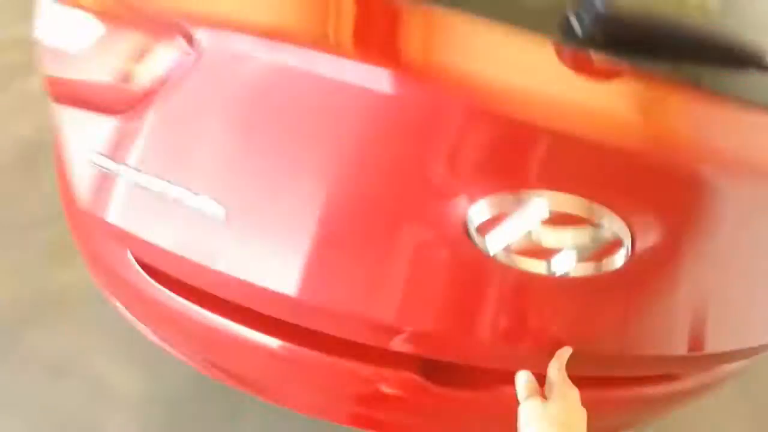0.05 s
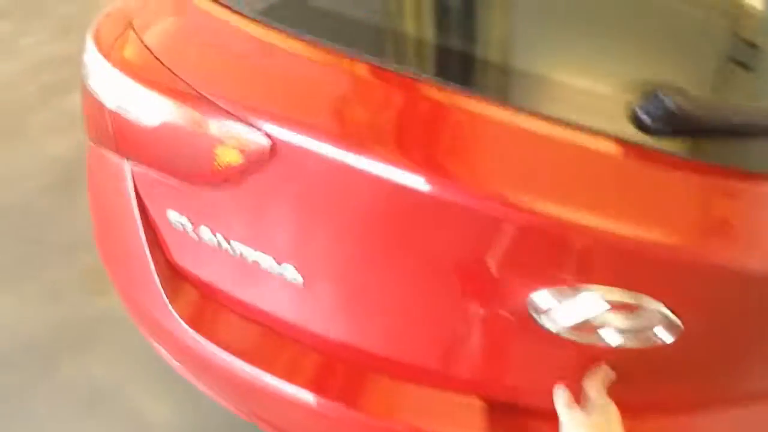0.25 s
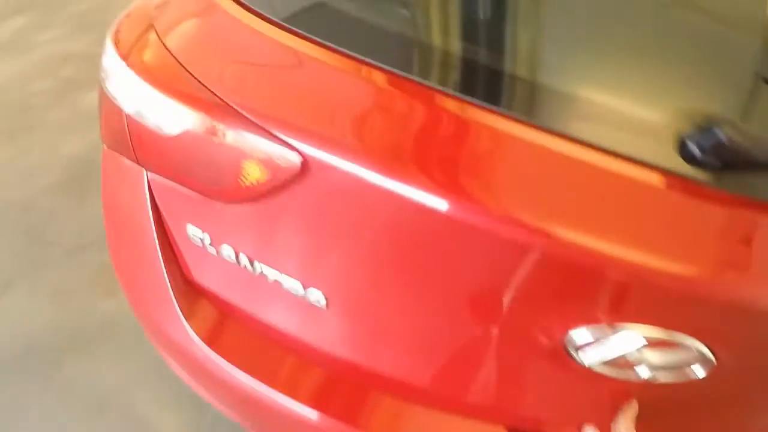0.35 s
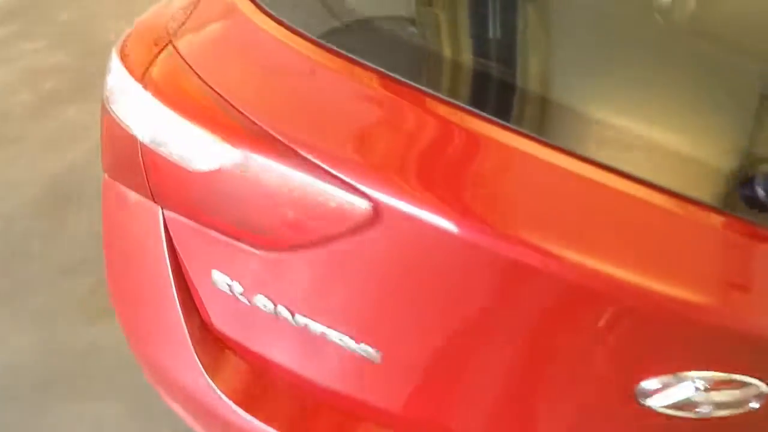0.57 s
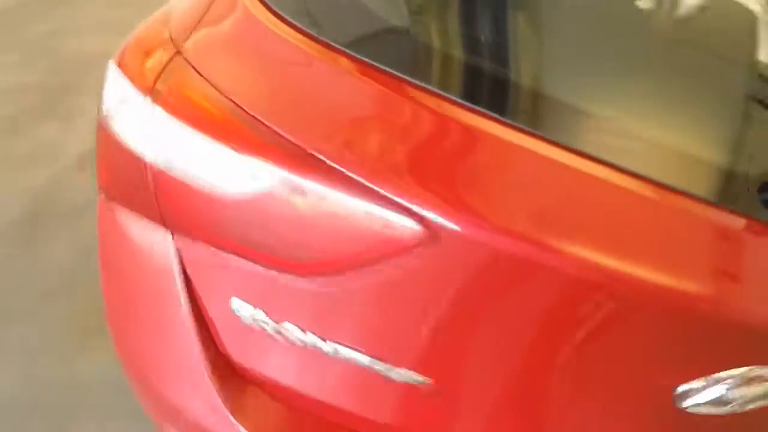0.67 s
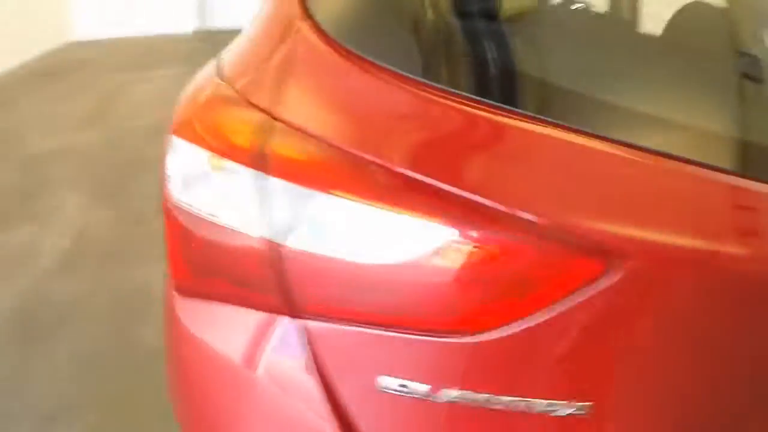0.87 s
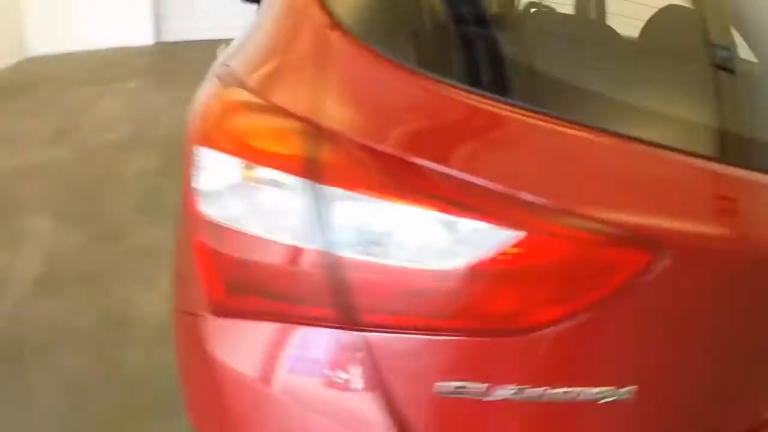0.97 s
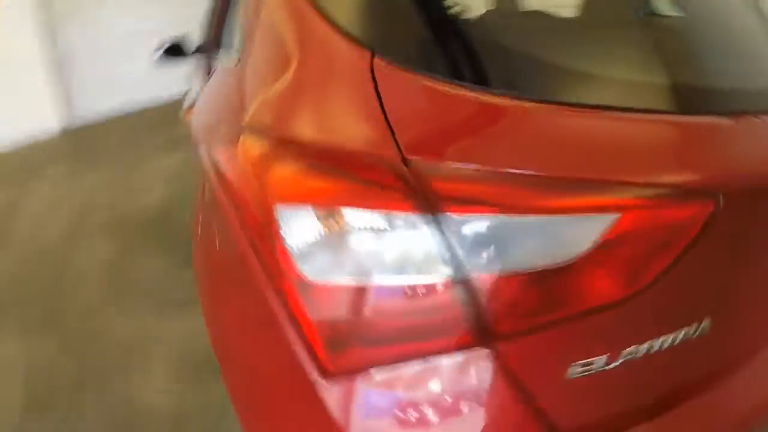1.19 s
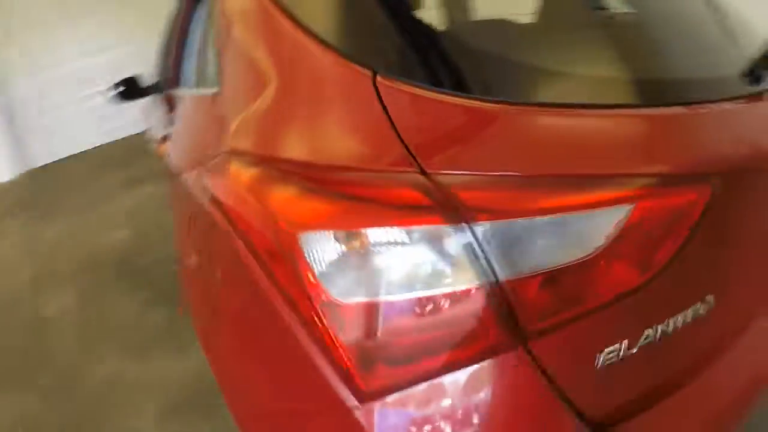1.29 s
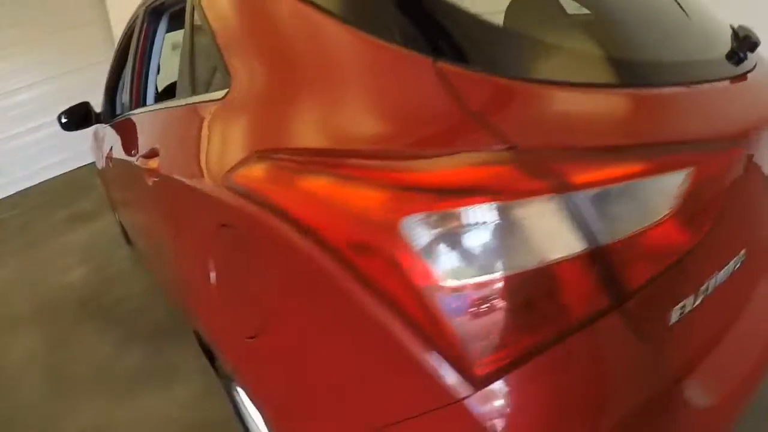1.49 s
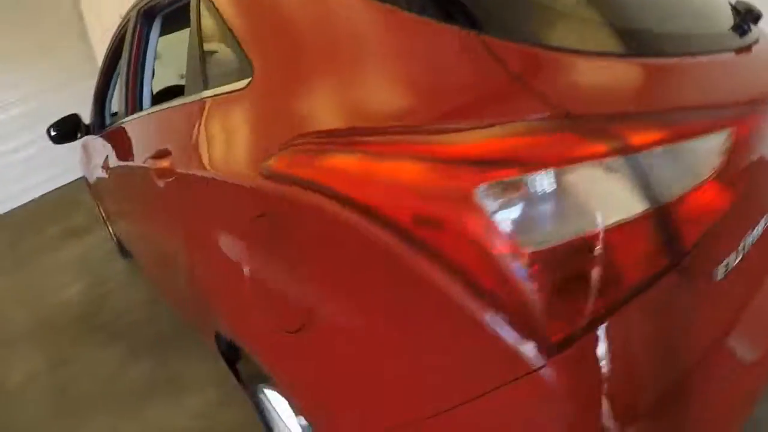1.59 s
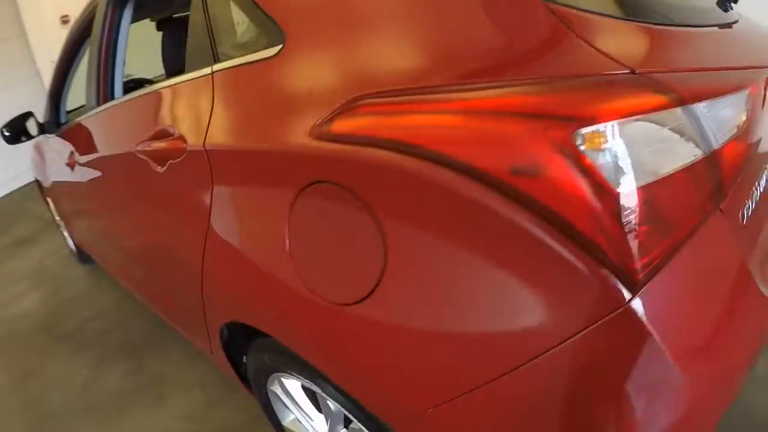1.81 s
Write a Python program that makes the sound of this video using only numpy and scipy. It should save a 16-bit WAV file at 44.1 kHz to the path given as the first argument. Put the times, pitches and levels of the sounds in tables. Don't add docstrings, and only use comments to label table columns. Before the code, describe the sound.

A car's rear hatch slams in a hard-walled garage, heard close on a handheld microphone. Low air rumble and swish come first; at about 0.25 s the seal, latch and bumpers hit almost together, a loud boomy thud with metallic clack, then a small rattle to 0.37 s. The dull echo decays while handling ticks and rustles appear from 0.7 to 1.15 s, with a low bump near 1.1-1.2 s.

```python
import sys
import numpy as np
from scipy import signal
from scipy.fft import rfft, irfft
from scipy.io import wavfile
from scipy.ndimage import uniform_filter1d

SR = 44100
rng = np.random.default_rng(int(sys.argv[2]) if len(sys.argv) > 2 else 0)


def magnitude_from_level(level_db):
    exponent = np.asarray(level_db, float) / 20
    return 10 ** exponent


def store_wav(level_fs):
    pcm = np.round(np.clip(np.atleast_2d(level_fs), -1, 1) * 32767)
    wavfile.write(sys.argv[1], SR, pcm.T.astype(np.int16))


N = 81585

# t/s, level/dB, burst length/s, upper limit f/Hz
CONTACTS = [
    (0.2404, -24, 0.0059, 1500),
    (0.25, -11, 0.0023, 1500),
    (0.248, -9.5, 0.0056, 4500),
    (.2500, -33, 0.011, 12350),
    (0.26, -20.5, 0.0043, 13000),
    (.2560, -15.5, 0.015, 4960),
    (0.27, -15.5, 0.0073, 5300),
    (0.277, -23.5, 0.013, 3000),
    (.3213, -28.5, .004, 3200),
    (0.3, -29.5, 0.043, 3600),
]


def clock():
    return np.arange(N) / SR


def unit(x):
    return x / np.sqrt(np.mean(x ** 2))


def white():
    return rng.standard_normal(N)


def bins():
    return np.arange(N // 2 + 1) * SR / N + 1


def colour(x, points):
    f, db = np.array(points).T
    gain = magnitude_from_level(np.interp(np.log(bins()), np.log(f), db))
    return irfft(rfft(x) * gain, N)


def band_noise(x, order, low, high):
    return signal.sosfilt(signal.butter(order, [low, high], "band", fs=SR, output="sos"), x)


def ring(x, modes):
    out = 0
    for hz, db, t60 in modes:
        radius = np.exp(-np.log(1000) / (t60 * SR))
        pole = radius * np.exp(2j * np.pi * hz / SR)
        out = out + magnitude_from_level(db) * np.sqrt(1 - radius) * signal.lfilter([1], [1, -pole], x).imag
    return out


def swing(modes):
    out = 0
    for at, hz, db, t60 in modes:
        u = np.maximum(clock() - at, 0)
        rise = 1 - np.exp(-4 * u * hz)
        out = out + rise * magnitude_from_level(db - 60 * u / t60) * np.sin(2 * np.pi * hz * u)
    return out


def burst(at, length):
    u = np.maximum(clock() - at, 0) / length
    return 2 * np.e * u * np.exp(-2 * u)


def walk(rate):
    k = int(SR / rate)
    return unit(uniform_filter1d(uniform_filter1d(white(), k), k))


def floor():
    # f/Hz, level/dB per Hz
    spectrum = [(12, -27), (20, -4), (123, -6), (222, -16.5), (270, -14), (367, -19.5), (1220, -24.5),
                (14700, -47), (16000, -57.5)]
    floor_db, swish_db, hum_hz, hum_db = -50.5, 2, 121, -55
    full = rfft(unit(colour(white(), spectrum)))
    noise = 0
    for octave in range(4, 15):
        share = np.clip(1 - np.abs(np.log2(bins()) - octave), 0, 1)
        noise = noise + irfft(full * share, N) * magnitude_from_level(walk(5))
    t = clock()
    hum = magnitude_from_level(hum_db + 1.5 * walk(4.2)) * np.sin(2 * np.pi * hum_hz * t)
    falling = t < CONTACTS[0][0]
    return noise * magnitude_from_level(floor_db + swish_db * falling) + hum


def air():
    # t/s, level/dB
    gusts = [(0, -29), (0.068, -24), (0.098, -39.5), (.14, -44), (.2, -39.5), (.3, -54), (.9, -45),
             (1.081, -51), (1.116, -38.5), (1.205, -39.5), (1.24, -55.5), (1.85, -57.5)]
    # f/Hz, level/dB
    gust_tone = [(15, -6), (30, -4), (52, 0), (100, -14), (200, -21.5), (350, -28.5), (600, -66.5)]
    sway_hz, sway_db, rumble_db = 51, -2.5, -1.5
    t = clock()
    phase = 2 * np.pi * sway_hz * t + .25 * walk(12)
    sway = magnitude_from_level(sway_db) * np.sqrt(2) * np.sin(phase)
    rumble = magnitude_from_level(rumble_db) * unit(colour(white(), gust_tone))
    gust_t, gust_db = np.array(gusts).T
    return magnitude_from_level(np.interp(t, gust_t, gust_db)) * (sway + rumble)


def ticks():
    # t/s, middle level/dB, treble level/dB
    tick_times = [(0.702, -58, -65), (.722, -58, -58), (.740, -48, -60), (0.757, -63, -60),
                  (.774, -47, -64), (.781, -60, -64), (0.787, -62, -69), (0.7994, -40, -45),
                  (0.803, -55, -61), (0.931, -50, -72), (.973, -66, -55), (0.992, -56, -64),
                  (1.002, -63, -58), (1.017, -47, -73), (1.026, -52.5, -68), (1.04, -54, -65),
                  (1.063, -54, -44), (1.068, -41, -35), (1.124, -47, -52), (1.132, -69, -54.5),
                  (1.138, -46, -48), (1.369, -78, -54)]
    # f/Hz, level/dB, t60/s
    mid_modes = [(3200, 0, .003), (4600, 0, .003), (1900, -5, .003)]
    # f/Hz, level/dB, t60/s
    top_modes = [(7500, -5, .002), (10500, 1, .003), (12500, -4, .002), (14500, -5, .002)]
    length_s, gain_db = .0008, 3
    mid, top = 0, 0
    for at, mid_db, top_db in tick_times:
        envelope = burst(at, length_s)
        mid = mid + magnitude_from_level(mid_db) * envelope
        top = top + magnitude_from_level(top_db) * envelope
    return magnitude_from_level(gain_db) * (ring(mid * white(), mid_modes) + ring(top * white(), top_modes))


def button():
    return swing([
        (1.0255, 3340, -44, 0.011),
        (1.0635, 3180, -44, 0.019),
        (1.0640, 4670, -41.5, 0.013),
        (1.0683, 3230, -37, 0.011),
        (1.0684, 4750, -35, 0.0074),
    ])


def rustle():
    # start t/s, length/s, level/dB, lowest f/Hz
    strokes = [
        (.70, 0.093, -64, 2700),
        (0.874, 0.23, -55.5, 930),
        (1.098, 0.063, -53, 1100),
        (0.8, 0.073, -44, 380),
        (1.4, .07, -64, 1900),
    ]
    span, grain_db = 5, 2.5
    grain = magnitude_from_level(grain_db * walk(600)) * white()
    rub = 0
    for at, length, db, hz in strokes:
        stroke = np.sin(np.pi * np.clip((clock() - at) / length, 0, 1))
        rub = rub + magnitude_from_level(db) * stroke * band_noise(grain, 1, hz, span * hz)
    return rub


def trim():
    # f/Hz, level/dB, t60/s
    trim_modes = [(8900, -12, .007), (10200, -12, .007), (14300, -28, .005), (500, 2, .012),
                  (2500, -6, .003)]
    at_s, level_db, length_s = .3640, -19, .002
    return magnitude_from_level(level_db) * ring(burst(at_s, length_s) * white(), trim_modes)


def garage():
    # f/Hz, level/dB, t60/s
    walls = [(44, -3, 3.2), (99, 0, 1.34), (253, 3.5, 1.107), (497, -6, 1.036), (1000, -8, 1.06),
             (1950, -17, 1.046), (4000, -20, 0.99), (6500, -25.5, 0.5), (10000, -34, 0.47),
             (14000, -40.5, 0.34)]
    wet_db, onset_s = -2.5, 0.013
    wall_hz, wall_db, wall_t60 = np.array(walls).T
    t = np.maximum(clock() - CONTACTS[2][0], 0)
    tail = 0
    for hz in 40 * 2 ** np.arange(0, 8.8, .5):
        db = np.interp(np.log(hz), np.log(wall_hz), wall_db)
        t60 = np.interp(np.log(hz), np.log(wall_hz), wall_t60)
        band = band_noise(white(), 2, hz / 2 ** .25, min(hz * 2 ** .25, 20000))
        tail = tail + band * magnitude_from_level(db - 60 * t / t60)
    return magnitude_from_level(wet_db) * tail * (1 - np.exp(-t / onset_s))


def cabin():
    return swing([(.2500, 60.4, -1, 0.15), (.2505, 78, -2, 0.14), (0.264, 25, -12, 0.59),
                  (.268, 47.5, -18, 2.2), (.300, 71, -19, 1.18), (.290, 133, -16.5, 0.24),
                  (0.31, 200, -10.5, 0.077), (.300, 375, -23.5, 0.57)])


def hatch():
    # f/Hz, level/dB, t60/s
    panel_modes = [(169.4, -8, 0.35), (224.1, -8, 0.05), (294.3, -4.5, 0.13), (369.8, -2.5, 0.21),
                   (454, -5.5, 0.058), (542.4, -17.5, 0.027), (766, -10, 0.25), (874, -5, .1),
                   (948, -5.5, 0.11), (1098, -2.5, 0.095), (1610, -11.5, 0.033), (2230, -10, 0.014),
                   (3720, -10.5, 0.01), (4440, -7.5, 0.025)]
    # t/s, f/Hz, level/dB, t60/s
    knocks = [
        (.2435, 207.4, 0, 0.021),
        (.2440, 1020, -8.5, 0.023),
        (.2518, 1226, 0.5, .022),
        (.2710, 290, -12.5, .06),
        (.2740, 5680, -22, .02),
        (.3340, 153, -19, 0.0072),
        (.3640, 4360, -19, 0.014),
    ]
    panel_db, crack_db = -8, -1
    force = 0
    for at, db, length, hz in CONTACTS:
        lowpass = signal.butter(3, hz, fs=SR, output="sos")
        chatter = unit(signal.sosfilt(lowpass, white()))
        force = force + magnitude_from_level(db) * burst(at, length) * chatter
    return magnitude_from_level(crack_db) * force + magnitude_from_level(panel_db) * ring(force, panel_modes) + swing(knocks)


def scene():
    camera = ticks() + button() + rustle()
    slam = trim() + garage() + cabin() + hatch()
    return (floor() + air() + camera + slam)[None]


def low_pass(x):
    return signal.sosfilt(signal.butter(12, 16470, fs=SR, output="sos"), x)


def record(dry):
    top_hz, drive = 15150, 1.058
    lowpass = signal.ellip(5, .3, 24, top_hz, fs=SR, output="sos")
    x = drive * signal.sosfilt(lowpass, dry)
    mix = .97 * x / (1 + x ** 4) ** .25
    return low_pass(mix)


dry = scene()
out = record(dry)
store_wav(out)
```